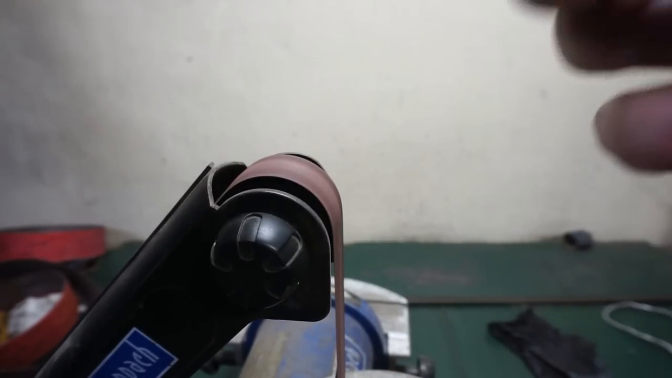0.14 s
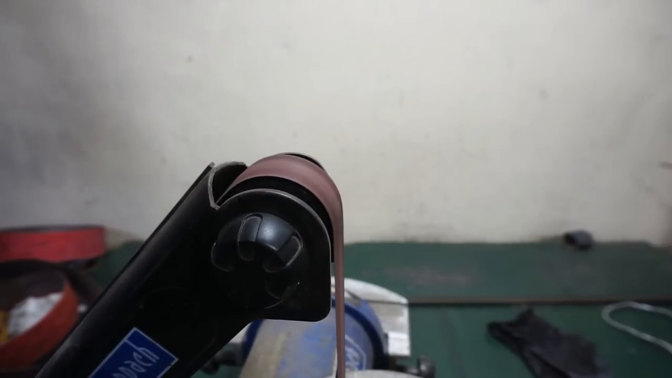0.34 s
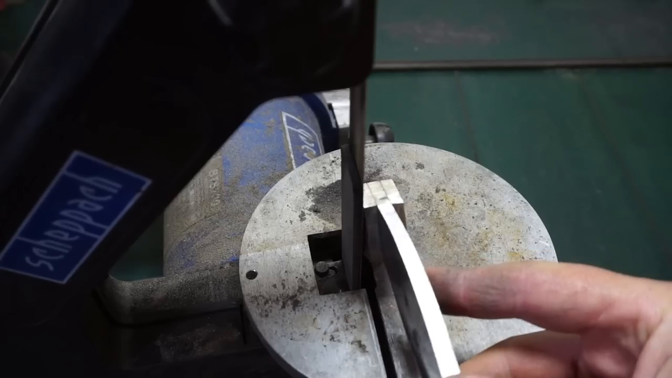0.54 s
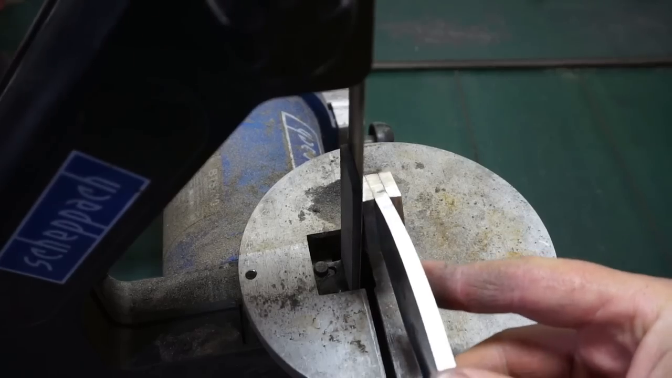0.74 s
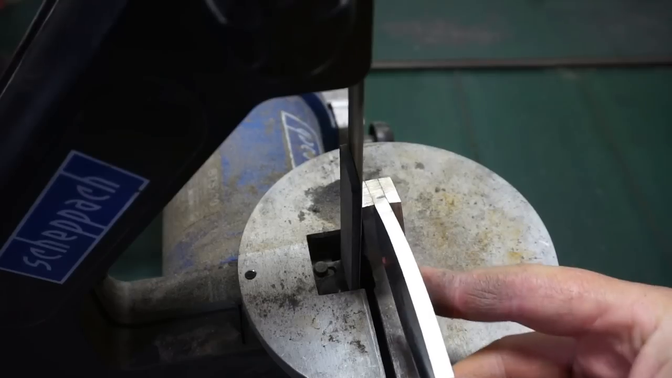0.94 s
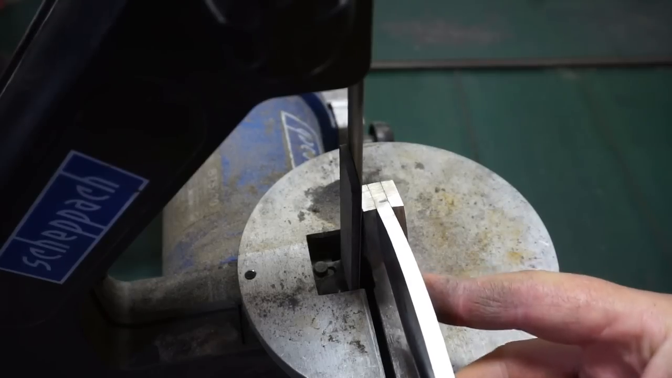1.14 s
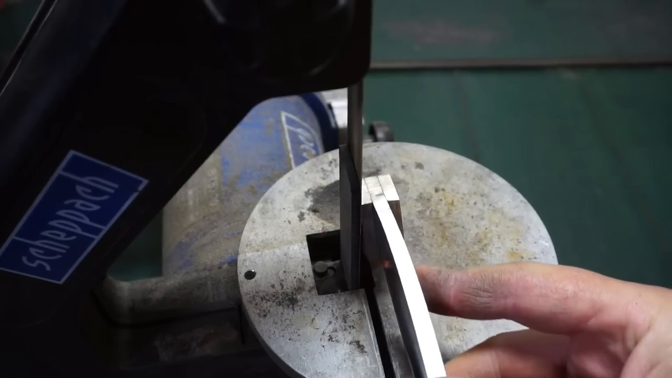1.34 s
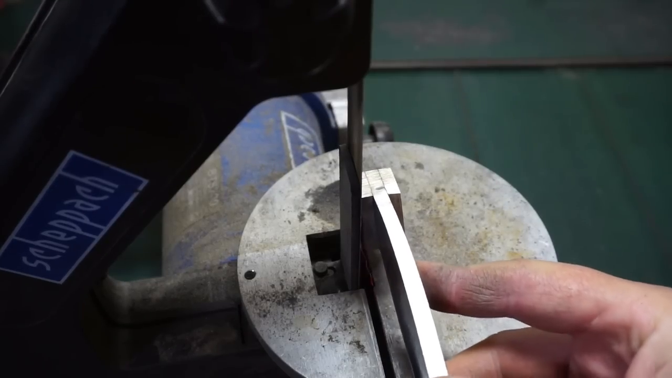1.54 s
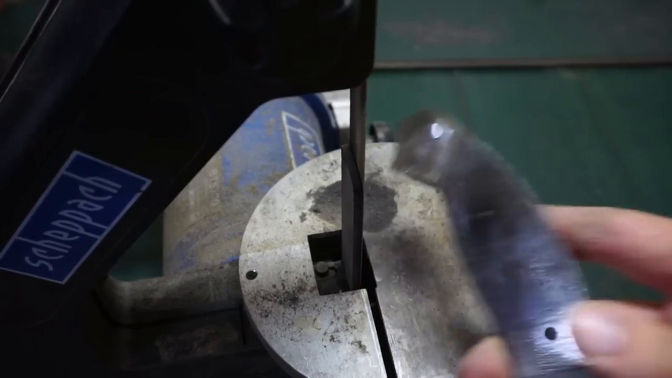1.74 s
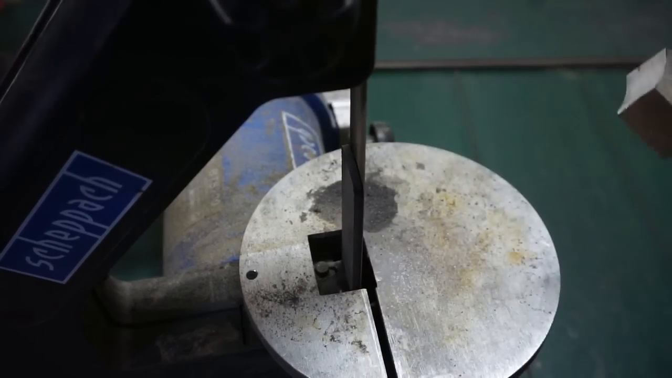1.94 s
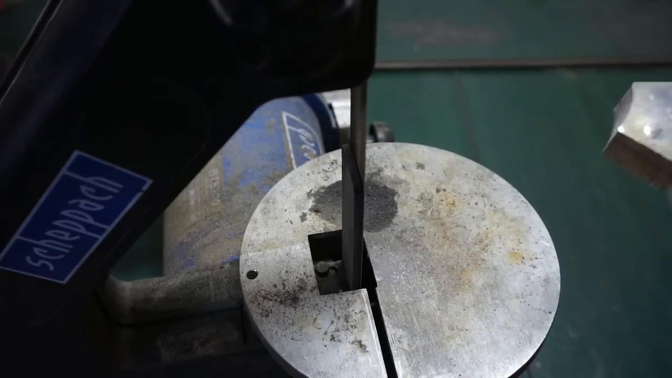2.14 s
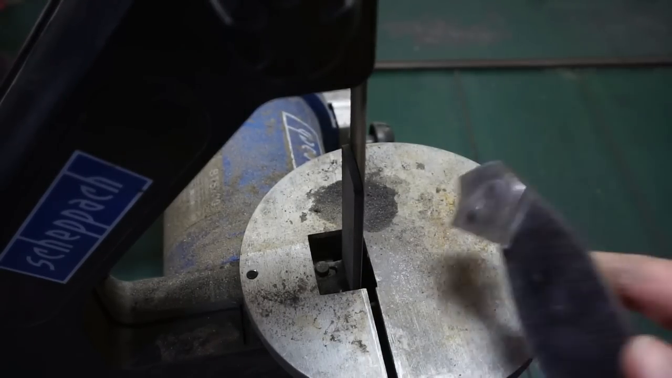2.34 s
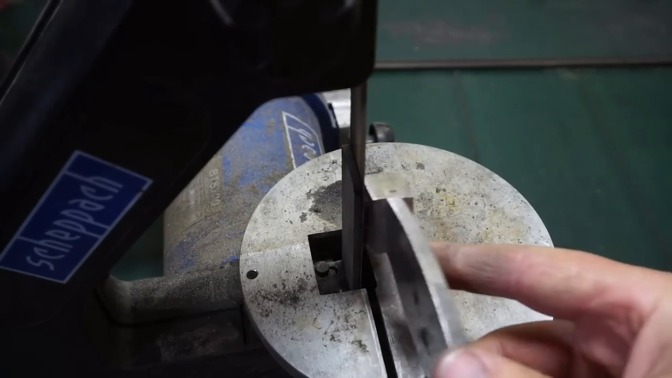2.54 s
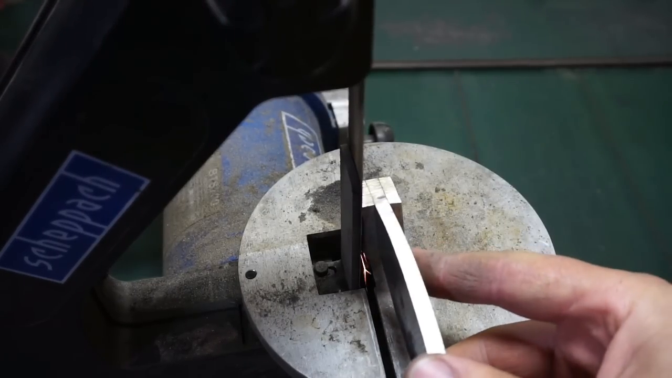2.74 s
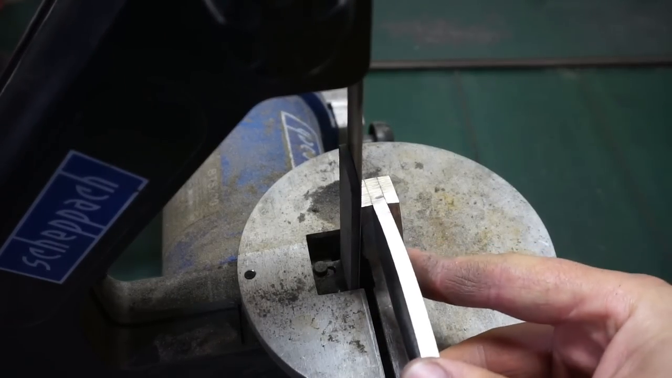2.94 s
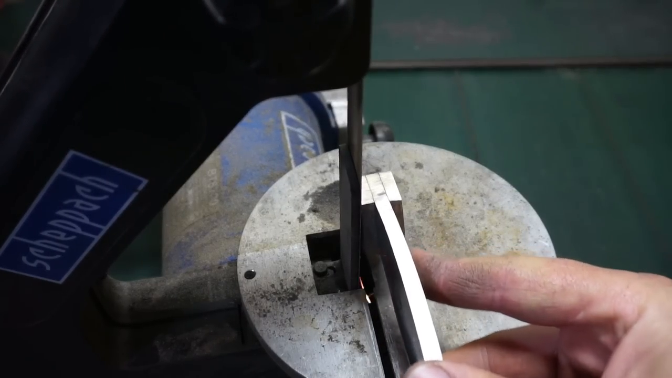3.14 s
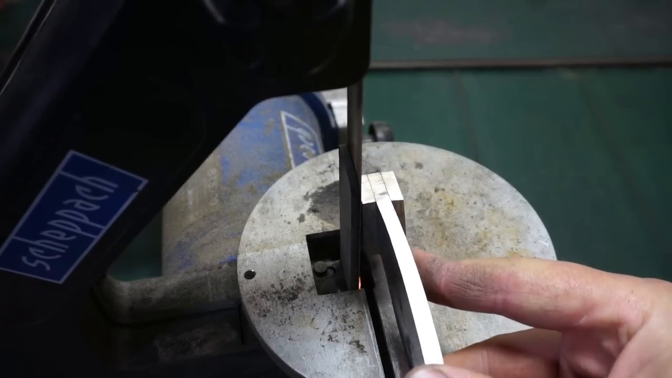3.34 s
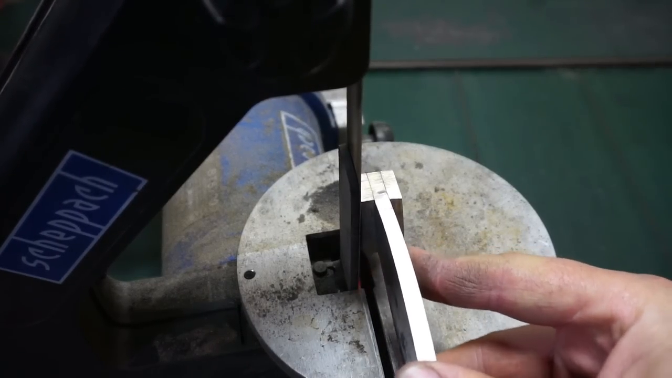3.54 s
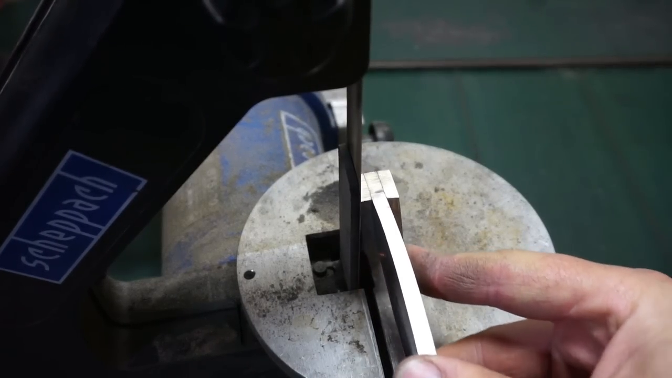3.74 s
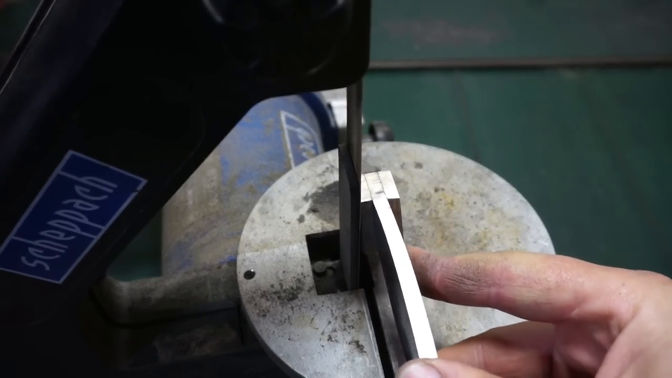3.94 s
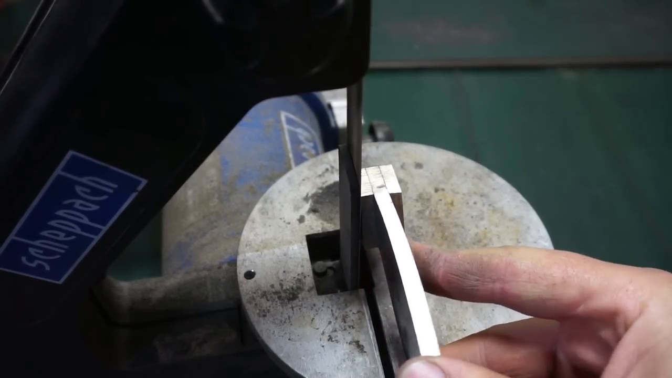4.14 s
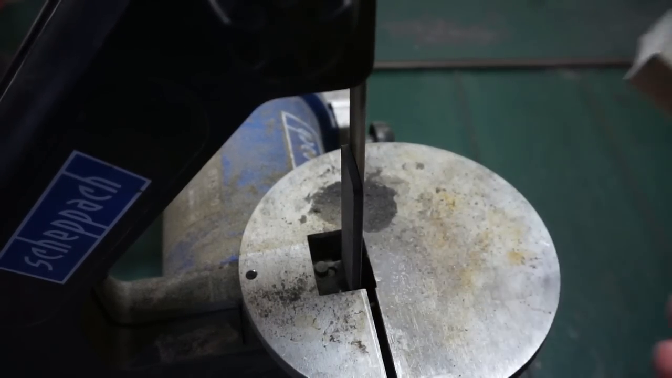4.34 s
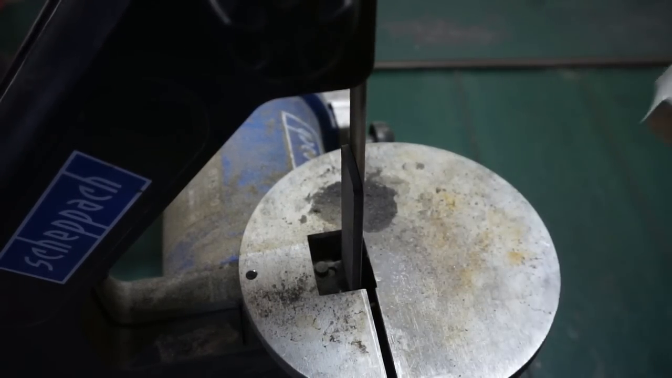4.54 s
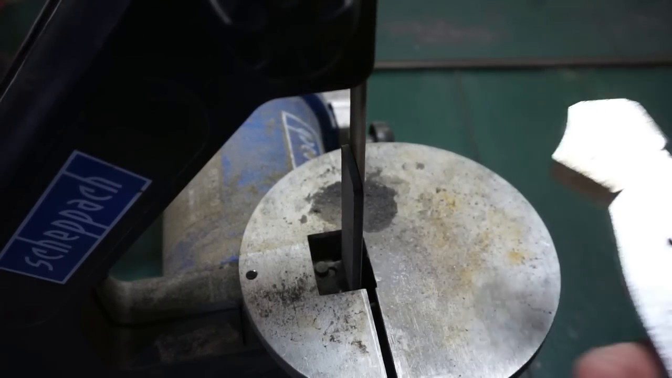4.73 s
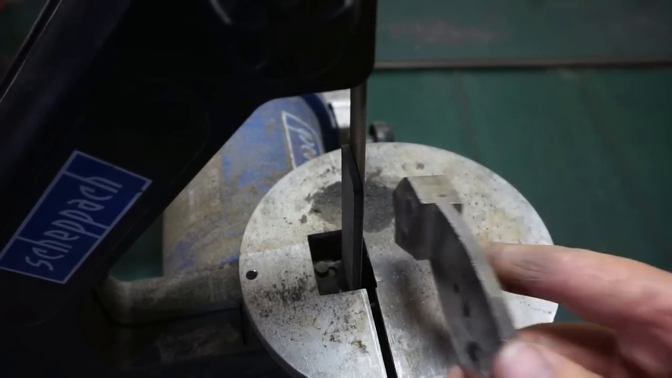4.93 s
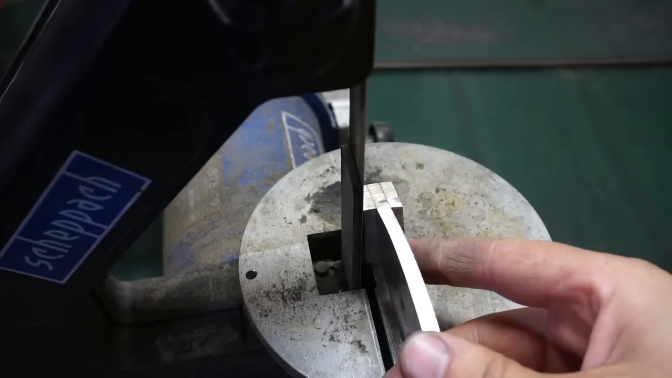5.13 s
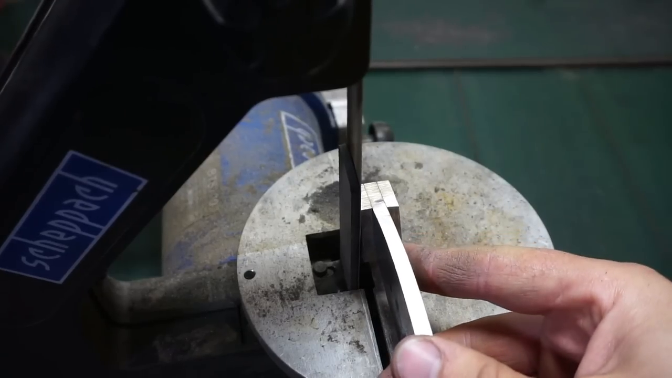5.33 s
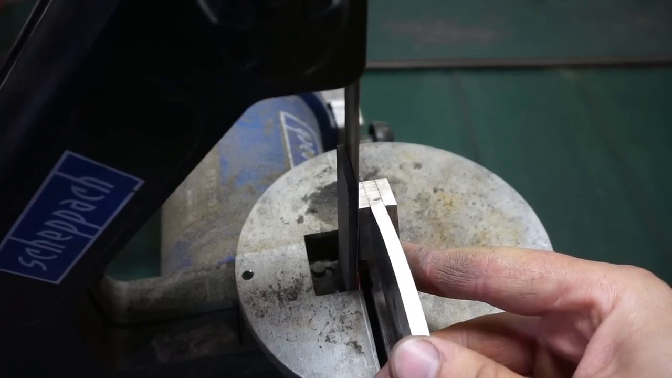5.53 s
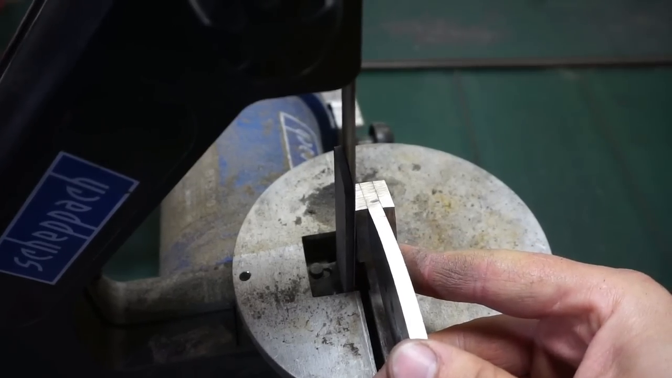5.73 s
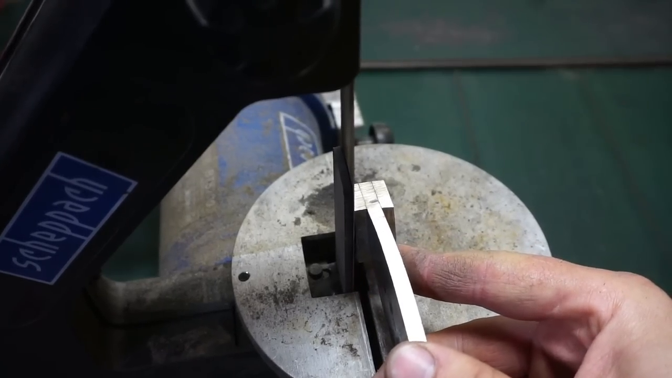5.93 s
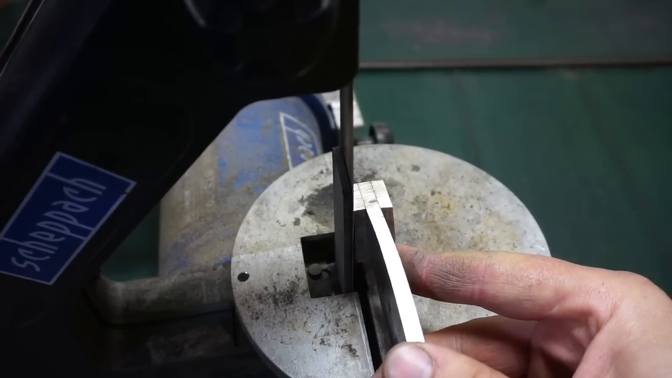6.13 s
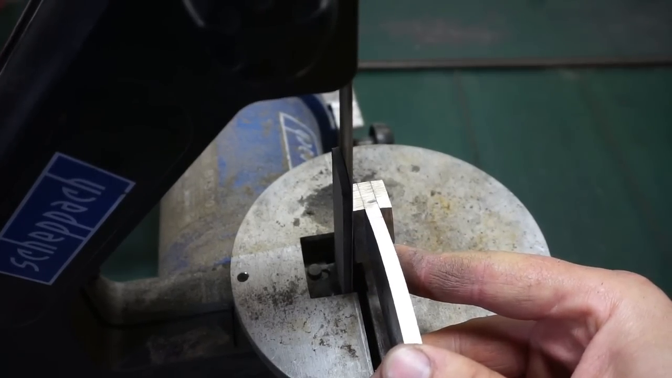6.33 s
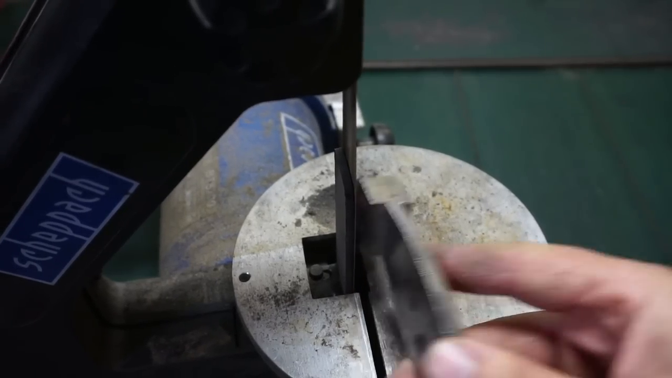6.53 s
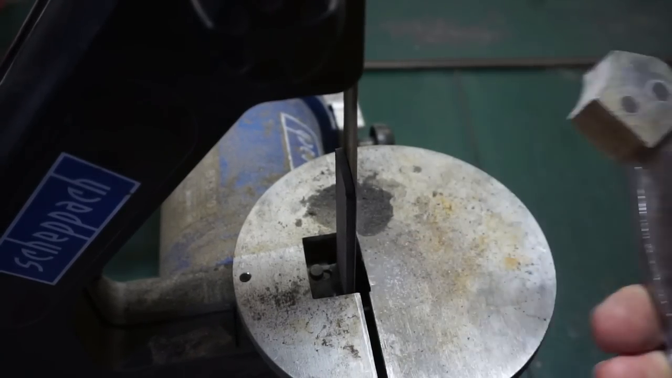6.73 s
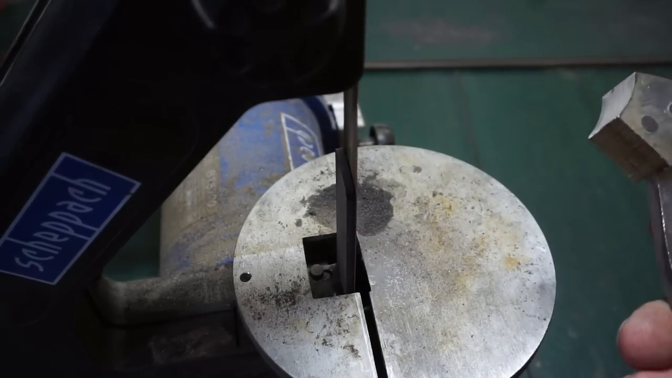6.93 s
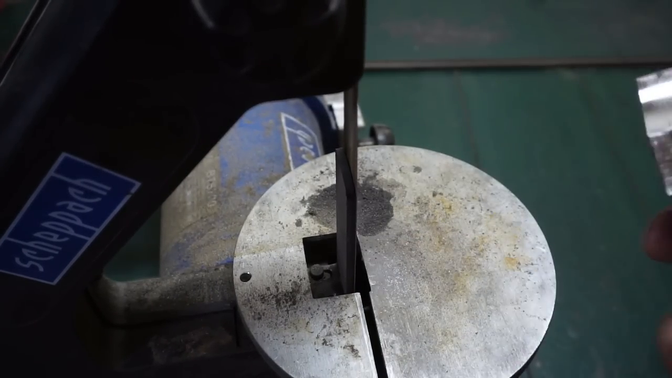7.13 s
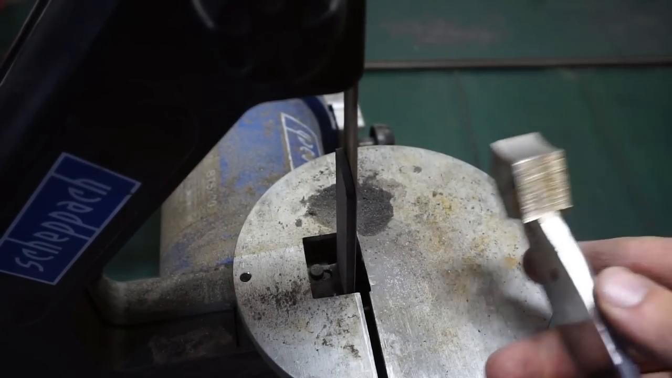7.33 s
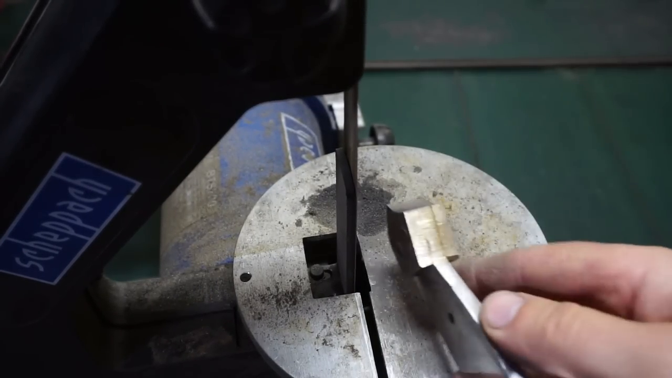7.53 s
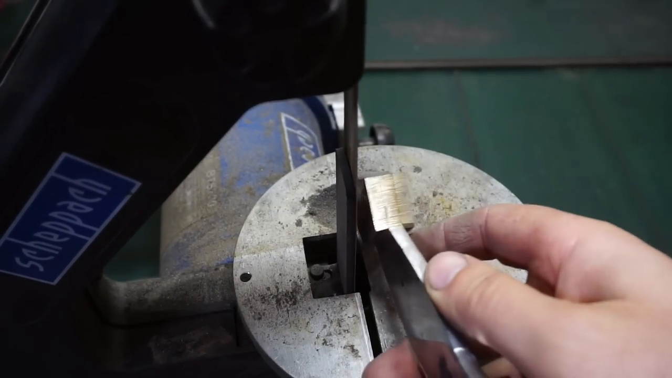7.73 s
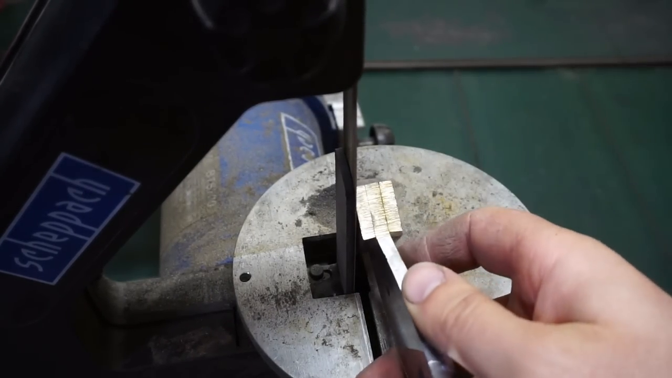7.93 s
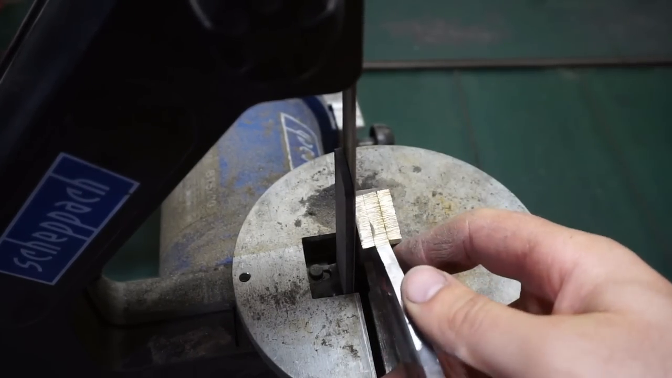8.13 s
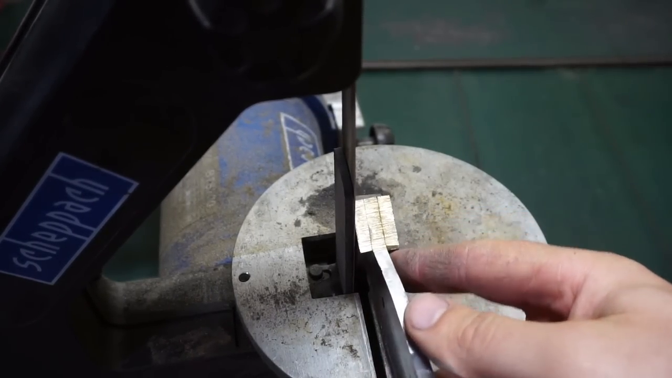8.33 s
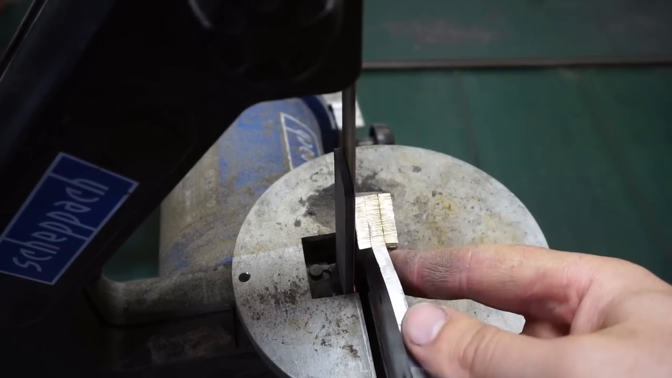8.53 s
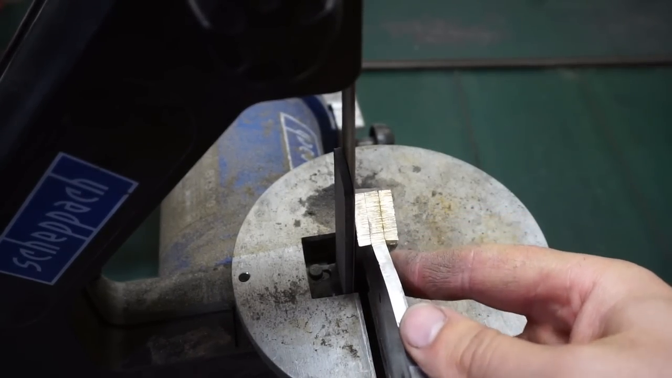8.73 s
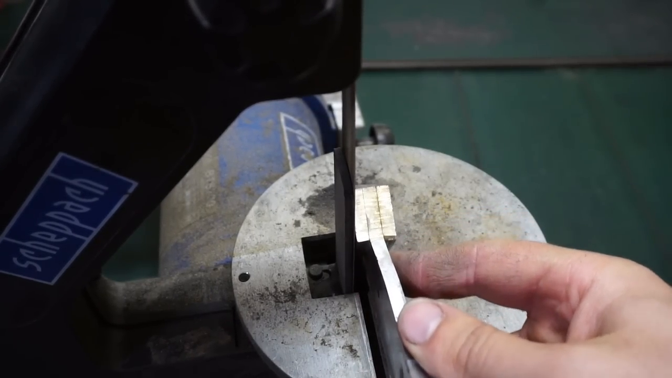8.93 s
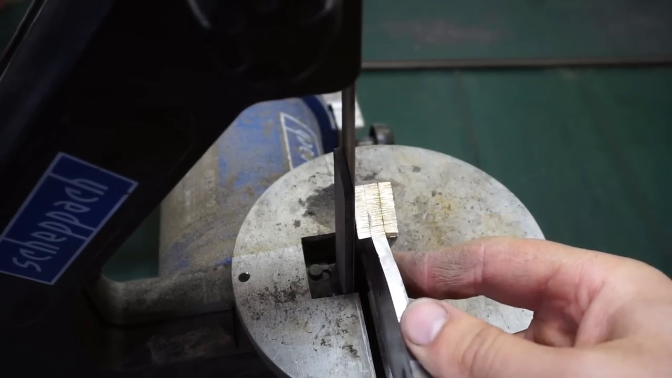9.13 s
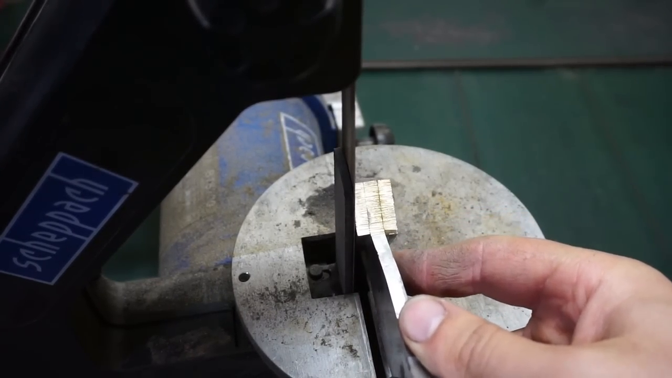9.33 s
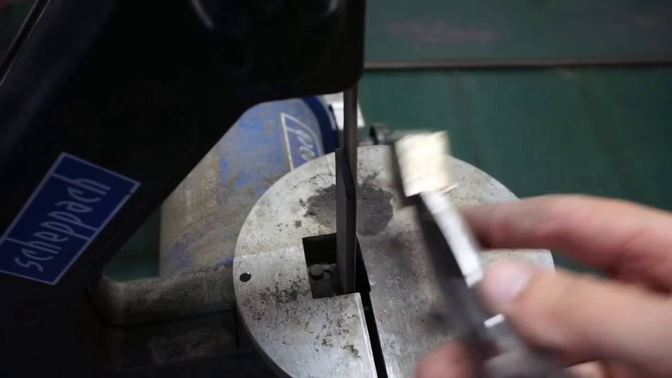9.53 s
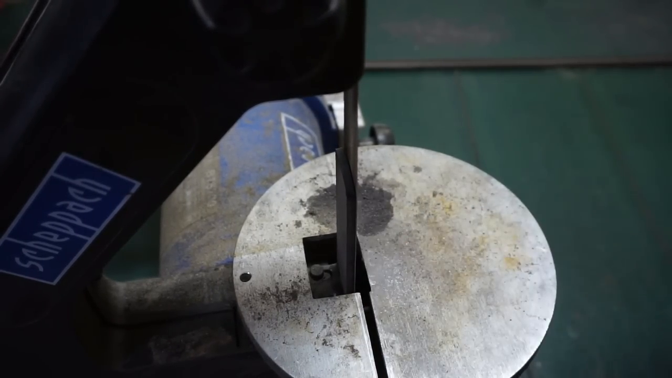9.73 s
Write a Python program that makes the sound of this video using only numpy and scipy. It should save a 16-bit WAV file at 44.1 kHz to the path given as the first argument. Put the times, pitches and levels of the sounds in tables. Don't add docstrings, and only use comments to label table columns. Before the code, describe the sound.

A small belt sander runs from the start, slightly distant: steady low motor hum, bench rumble, hollow frame drone and airy belt hiss. At 0.55 s the view turns close and steel is already biting: bright tearing scrape, midrange metallic ringing from the backing plate, gritty jolts, motor pitch sagging slightly. A sharp flare ends it at 1.7 s; the shaft spins up quickly and the drone and hiss swell back with small belt slaps. The second grind, 2.57-4.2 s, wavers, skipping briefly near 3.35 s. Free running follows. The third, 5.07-6.55 s, opens with a high squeal and sags deepest. More free drone, flapping around 7.3 s. The fourth, 7.83-9.5 s, begins hesitantly with chirps and knocks, then scrapes loudest and brightest, singing thinly. The belt then runs free to the end. Close, dry stereo; automatic gain ducks the hum under each grind.

```python
import sys
import numpy as np
from scipy import signal
from scipy.fft import rfft, irfft, next_fast_len
from scipy.io import wavfile
from scipy.ndimage import uniform_filter1d

SR = 44100
rng = np.random.default_rng(int(sys.argv[2]) if len(sys.argv) > 2 else 0)


def voltage_ratio(decibels):
    exponent = np.asarray(decibels, float) / 20
    return 10 ** exponent


def pcm_store(signal):
    levels = np.round(np.clip(np.atleast_2d(signal), -1, 1) * 32767)
    wavfile.write(sys.argv[1], SR, levels.astype(np.int16).T)


N = 430857
TIME_S = np.arange(N) / SR
SLOW_S = TIME_S[::64]
LEAD = 2048

# (frequency [Hz], likeness [0-1], left lag [rad], left-right [dB])
PORTS = [(193, 0.94, 0.5, 1), (322, 1, -1.54, 1.5), (520, 1, 0.16, -9.5), (780, 0.94, -0.05, 0),
         (1130, 0.72, 0, -5), (1740, 0.91, -0.7, -0.5), (2150, 0.97, 0.5, -3), (2700, 0.44, 0.6, -3.5),
         (3420, 0.4, 0.7, -1), (4200, 0.17, 1.2, -4.5), (6000, 0.46, 1.1, -5), (8140, 0.43, 1.6, -3),
         (9500, 0.45, 1.45, -2), (11500, 0.57, 4, -4), (15500, 0.56, 3.5, -4)]

# (multiple of pulse rate, near level [dB], far level [dB])
HUM_TONES = [(2, -20, -25), (3, 0, -0.5), (4, -9, 0), (5, -16.5, -13), (6, -9.5, -7), (7, -4, -18),
             (8, -4.5, -9), (9, -5, -4)]
# (frequency [Hz], density [dB/Hz])
HUM_AIR = [(140, -72), (235, -3), (274, -1), (319, -4), (405, -5), (454, -6.5), (572, -1.5), (620, -7),
           (810, 1), (1360, -120)]
# (multiple, time [s], gain [dB], half length [s])
HUM_SWELLS = [(8, 3.16, 21.5, 0.32), (8, 4.0, 10, 0.21), (8, 2.26, 9.5, .25), (9, 2.47, 9, 0.28),
              (7, 1.93, 6.5, 0.23), (4, 2.35, -16, 0.18), (8, 4.43, 5, .25), (7, 4.53, 4.5, .3),
              (7, 7.1, 3, 0.27), (4, 7.63, 7, .3), (5, 7.7, 11, 0.37), (6, 7.15, 6, 0.19),
              (8, 4.66, 9, 0.053), (9, 7.3, 8, .1), (9, 4.8, 6, .1), (4, 1.6, 7, 0.35), (4, 8.8, 6.5, .3),
              (8, 7.2, 5, .07), (3, 7.8, -3, .04), (6, 4.58, -1, 0.074), (8, 9.15, 12, 0.21),
              (7, 9.65, 7, 0.16), (8, 0.93, 8, 0.23), (4, 5.92, 11.5, 0.35), (6, 5.79, 13.5, 0.32),
              (5, 6.85, 12.5, 0.33), (4, 2.85, 8, 0.2), (6, 2.72, 10.5, 0.13)]
# (frequency [Hz], density [dB/Hz])
RUMBLE = [(12, -40), (20, -26), (32, 1), (49, -5.5), (101, -1), (135, -8), (171, -5), (200, -9), (260, -28),
          (440, -120)]

# (start [s], settled drone [dB], settled hiss [dB], settled hum [dB], gain still held down [dB])
IDLES = [
    (0, -50, -54.5, -55, 5.5),
    (1.715, -44.5, -47, -50, 7),
    (4.215, -42.5, -45, -49, 9),
    (6.55, -43, -45, -49, 8.5),
    (9.49, -42.5, -45, -49, 4.5),
]
# (frequency [Hz], width [Hz], level [dB])
DRONE_MODES = [(670, 49, 3), (720, 72, 4), (772.5, 98, -0.5), (1288, 74, -7.5), (1494, 108, -9),
               (1790, 63, -9), (1927, 73, -11), (2203, 142, -6)]
# (frequency [Hz], density [dB/Hz])
DRONE_BED = [(450, -26), (600, -40), (1000, -15.5), (2300, -34.5), (2700, -22.5), (4000, -31)]
# (frequency [Hz], density [dB/Hz])
HISS_FAR = [(1530, -38), (2600, -12), (3020, -8), (3650, -4), (3940, -6), (5160, -1.5), (5650, -3),
            (7030, -3), (8680, -5), (13200, -5), (15800, -9)]
# (frequency [Hz], density [dB/Hz])
HISS_NEAR = [(1530, -23), (2600, -7), (3240, -5.5), (5200, -0.5), (5520, -4), (5960, 0), (7640, -5.5),
             (8880, -2.5), (11100, -5), (12100, -2.5), (13500, -6.5), (14900, -3), (15800, -12)]
# (time [s], peak [dB])
SLAPS = [(1.941, -37), (2.279, -39), (2.456, -37), (4.447, -41), (4.66, -34), (4.819, -40), (5.019, -47),
         (7.158, -40), (7.289, -34), (7.345, -38), (7.459, -36), (7.646, -33), (7.719, -35), (9.66, -37)]

# (first touch [s], belt pressed onto plate [s], lift [s], speed sag [Hz])
GRINDS = [
    (.553, .553, 1.715, 2.0),
    (2.572, 2.64, 4.215, 2.9),
    (5.068, 5.14, 6.566, 3.8),
    (7.826, 7.962, 9.515, 1.9),
]
# (scrape [dB], sizzle [dB], hum [dB], hum growth [dB/s], rumble [dB])
BITES = [
    (-52.5, -50.5, -55, -3.5, -84),
    (-49.5, -52, -57, -2.5, -84.5),
    (-49, -52, -57, -0.5, -84.5),
    (-45, -51.5, -56, 2, -78.5),
]
# (time [s], pressure as plate level [dB], lean onto frame [dB])
HANDS = [
    [(.553, -40, -5), (.565, -42, -9.5), (.75, -41, -8.5), (.9, -41.5, -9), (1.02, -41, -10),
     (1.25, -41, -10), (1.5, -41, -10), (1.6, -41, -7.5), (1.715, -44.5, -11)],
    [(2.64, -47.5, -3), (2.75, -40, -10), (2.98, -39.5, -14), (3.09, -42, -12), (3.2, -39.5, -7.5),
     (3.43, -43, -8.5), (3.6, -39.5, -10), (3.88, -40.5, -8.5), (4.215, -42.5, -12)],
    [(5.14, -47.5, -5), (5.26, -40.5, -10), (5.4, -41, -8), (5.55, -41, -9), (5.75, -42.5, -4.5),
     (5.97, -40.5, -9), (6.2, -42, -8), (6.32, -39.5, -12.5), (6.54, -41.5, -9.5)],
    [(7.962, -47, -8), (8.0, -45.5, -4.5), (8.2, -45, -7), (8.33, -42, -5.5), (8.5, -45.5, -5),
     (8.67, -40.5, -7), (8.8, -44.5, -6.5), (9.1, -43.5, -6), (9.49, -43, -6)],
]
# (frequency [Hz], width [Hz], level [dB])
FRAME_MODES = [(699.4, 32.5, 0), (796, 51, 0.5)]
# (frequency [Hz], density [dB/Hz])
FRAME_BED = [(400, -39), (580, -21), (900, -5.5), (1100, -50)]
# (frequency [Hz], width [Hz], level [dB])
PLATE_MODES = [(1018, 15, -8), (1238, 40, -6.5), (1498, 48, -2), (1559, 36, 0.5), (1697, 33, -3),
               (1783, 39, -5), (2002, 56, -3), (2140, 35, 3.5), (2254, 48, -0.5), (2707, 55, -8.5),
               (2815, 38, -10.5), (3066, 85, -11.5), (3850, 200, -19), (4920, 110, -17)]
# (frequency [Hz], width [Hz], level [dB])
PLATE_END_MODES = [(1260, 22, -7), (1560, 112, -6), (2025, 83, -4.5), (2151, 45, 0.5), (2274, 58, -2),
                   (2563, 19, -8), (3063, 45, -10.5), (3827, 210, -18.5), (5100, 100, -19.5)]
# (frequency [Hz], density [dB/Hz])
PLATE_BED = [(800, -52), (1000, -16.5), (1850, -16), (2200, -17), (2420, -14.5), (2700, -14), (3400, -20),
             (4500, -19), (5600, -21.5), (7500, -31)]
# (time [s], peak [dB], upper ring relative to it [dB])
JOLTS = [(0.767, -33, -10), (0.8562, -28, -8), (0.8942, -30, -6), (0.9391, -32, -5), (1.0039, -31, -8),
         (1.1097, -31, -9), (1.2928, -35, -8), (1.3521, -30, -7), (1.5362, -38, -5), (1.5991, -30, -3),
         (2.6477, -35, 0), (2.677, -32, 0), (2.725, -31, 0), (2.7879, -37, -5), (2.8303, -40, -4),
         (2.8682, -32.5, -3), (3.0453, -31, -8), (3.1855, -32, -8), (3.2363, -35, -4), (3.2777, -33, -4),
         (3.3596, -27, -8), (3.4204, -27, -7), (3.5377, -29, -11), (3.8425, -29, -3), (4.0026, -30, -4),
         (4.0964, -35, 0), (4.1702, -29, -8), (5.2912, -31.5, -5), (5.3934, -34, -6), (5.4503, -34, -5),
         (5.6149, -32, -7), (5.6509, -39, -7), (5.9157, -37, -10), (5.9661, -34, -6), (6.0654, -32, -5),
         (6.1647, -28, -7), (6.2305, -33, -4), (6.3039, -32, -7), (6.3772, -35, -8), (6.446, -33, -8),
         (6.4924, -26.5, -8), (7.8294, -38, -7), (7.9651, -36, -7), (8.0319, -36, -2), (8.0709, -28, -13),
         (8.4395, -38, -6), (8.8725, -27.5, -6), (8.9863, -37, -9), (9.0247, -28, -5), (9.4128, -32, -8)]
# (time [s], loss [dB])
SLIPS = [
    (1.329, 8),
    (3.343, 9),
    (3.445, 6),
    (7.82, 6.5),
    (8.02, -2),
]

# (frequency [Hz], density [dB/Hz])
SCRAPE = [(3650, -10), (6200, -0.5), (6610, 5.5), (7370, 0.5), (9210, -0.5), (11000, -3), (12500, -4),
          (16200, -37), (22000, -120)]
# (frequency [Hz], density [dB/Hz])
SCRAPE_THICK = [(3650, -19), (6200, -4), (8170, -1.5), (9320, -1), (11000, -7), (12500, -5.5), (16200, -41),
                (22000, -120)]
# (frequency [Hz], width [Hz], level [dB])
THICK_MODES = [(7550, 50, 6), (8110, 81, -7), (8550, 130, -7), (9500, 100, 2), (10600, 37, -18.5)]
# (frequency [Hz], density [dB/Hz])
SIZZLE = [(5880, -38), (10000, -3), (11000, -10), (13700, 2), (15100, -1), (15800, -1)]
# (time [s], centre [Hz], level above scrape [dB])
EDGE = [(.55, 8100, -4), (1.6, 8350, 5), (1.7, 9500, -7), (2.57, 9500, -4), (2.7, 8300, -15),
        (3.5, 9200, -2), (3.65, 8650, -10), (4.2, 9000, -1), (5.07, 9700, 9), (5.15, 9500, -5),
        (5.25, 8500, -8), (6.5, 8650, -10), (7.83, 7240, -15), (7.95, 7400, -2), (8.1, 7540, -16),
        (8.35, 8600, -3.5), (9.0, 8300, -11), (9.5, 8600, -6)]
# (time [s], scrape flare [dB], sizzle flare [dB], rise [s], fall [s])
CATCHES = [(.559, 4, 4.5, .004, .25), (1.705, 15.5, 6, 0.022, .006), (2.582, 6, 5, .008, 0.24),
           (3.466, 5, 3, .01, .06), (4.215, 3, 2, .01, .01), (5.104, 7, 2.5, .04, 0.14),
           (5.558, 5, 4, .03, .015), (5.88, 0, 5, 0.15, .1), (6.546, 7.5, 5, .008, .012),
           (7.858, 7, 3, .012, 0.024), (7.835, 1, 7, .01, 0.011), (7.89, -10, 5, 0.013, 0.0073),
           (7.96, 1, 0, .05, .04), (8.24, 1, 2, 0.11, .015), (9.505, -2, 1, 0.0098, .01),
           (9.48, 1, 0, .4, 0.049)]

# (time [s], level [dB])
KNOCKS = [
    (4.096, -41),
    (7.83, -41),
    (8.032, -37),
    (8.44, -41),
]
# (time [s], frequency [Hz], level [dB], rise [s], fall [s])
SQUEALS = [(5.08, 9500, -48, .004, .06), (5.115, 13700, -54, .015, .03), (5.12, 6600, -58, .02, .03),
           (7.87, 12300, -46, .02, 0.033), (7.93, 7600, -58, .03, .06), (8.235, 14600, -48, .08, .012),
           (8.33, 8900, -51, 0.014, .05), (8.39, 8800, -54, 0.023, 0.033), (8.44, 8700, -55, .015, .05),
           (5.19, 8000, -57, .01, .015), (8.7, 8300, -60, .08, 0.098), (9.0, 8500, -54, .08, .08),
           (9.3, 8400, -52, .08, .1)]

NEARER_S = 0.553
FREE_HZ, FAR_EXTRA_HZ, ROLLER_HZ = 90.4, 0.8, 29.2
SAG_S, SPIN_UP_S = 0.12, 0.0504
RECOVER_S, HUM_SHARE, RUMBLE_BELOW_DB = 0.37, 0.75, 19
TOUCH_DRONE_DB, TOUCH_HISS_DB, TOUCH_HUM_DB = 7.5, 4.5, 7.5
TOUCH_S, SETTLE_S = 0.032, 0.099
DEEP_S, DEEP_DB, DEEP_HALF_S = 8.18, 7, 0.14
SLIP_S, LIFT_S, LIFT_DB = 0.015, 0.017, 11
SLAP_FROM_DB, SLAP_SHARE, SLAP_RISE_S, SLAP_FALL_S = -40.5, 0.47, 0.0055, 0.022
JOLT_FROM_DB, JOLT_SHARE, JOLT_RISE_S, JOLT_FALL_S = -35, 0.68, 0.0065, 0.021
JOLT_EVEN_DB, RINGS_PART_HZ = -5.5, 1840
STEADY, STEADY_S = 0.94, 0.044


def evened(x):
    return x / np.sqrt(np.mean(x ** 2) + 1e-20)


def above(x, hz):
    return signal.sosfilt(signal.butter(3, hz, "high", fs=SR, output="sos"), x)


def read(points, hz, axis=1):
    table = np.transpose(points)
    return np.interp(np.log(hz + 1), np.log(table[0] + 1), table[axis])


def fine(values):
    return np.interp(TIME_S, SLOW_S, values)


def bump(t, s, rise_s, fall_s):
    return np.exp(-abs(t - s) / np.where(t < s, rise_s, fall_s))


def since(t, s, fall_s):
    return (t >= s) * bump(t, s, 1, fall_s)


def surges(t, rows, from_db, share, rise_s, fall_s):
    return sum(share * max(db - from_db, 0) * bump(t, s, rise_s, fall_s) for s, db in rows)


def slips(t):
    return sum(db * bump(t, s, SLIP_S, SLIP_S / 2) for s, db in SLIPS)


def drift(hz, size):
    knots_hz = 400
    knots = rng.standard_normal(int(size / SR * knots_hz) + 9)
    knots = signal.lfilter(*signal.butter(1, 2 * hz / knots_hz), knots)
    return np.interp(np.arange(size) / SR * knots_hz, np.arange(len(knots)), evened(knots))


def grit(size, per_s, spread_db):
    sizes_db = spread_db * np.minimum(rng.exponential(1, (2, size)), 3.5)
    heights = voltage_ratio(sizes_db) * rng.standard_normal((2, size))
    return evened(heights * (rng.random((2, size)) < per_s / SR))


def body(drive, bed, modes, lo_hz, hi_hz, bed_db=0):
    size = next_fast_len(drive.shape[1] + 8192)
    hz = np.fft.rfftfreq(size, 1 / SR)
    ring = sum((-1) ** k * voltage_ratio(db) * w / (w + 2j * (hz - f)) for k, (f, w, db) in enumerate(modes))
    smooth = voltage_ratio(read(bed, hz) + bed_db) * np.minimum(hz / bed[0][0], 1) ** 4
    skirts = np.minimum(smooth * voltage_ratio(28), 1)
    phase = np.angle(ring + smooth + 1e-9)
    colour = np.sqrt(abs(ring * skirts) ** 2 + smooth ** 2) * np.exp(1j * phase)
    inside = (hz > lo_hz) & (hz < hi_hz)
    colour /= np.sqrt(np.sum(abs(colour[inside]) ** 2) / len(hz))

    same, lag_rad, tilt_db = (read(PORTS, hz, axis=k) for k in range(1, 4))
    same = np.clip(same, 0, 1)
    left, right = voltage_ratio(tilt_db / 2), voltage_ratio(-tilt_db / 2)
    shared = right * same * np.exp(1j * lag_rad)
    own = right * np.sqrt(1 - same ** 2)
    colour /= np.sqrt(abs(left + shared) ** 2 + own ** 2) / 2
    a, b = rfft(drive, size)
    ports = irfft(colour * np.array([left * a, shared * a + own * b]), size)
    return np.roll(ports, LEAD, axis=1)


def add(mix, s, sound):
    start = round(s * SR) - LEAD
    part = mix[:, max(start, 0):start + sound.shape[1]]
    part += sound[:, max(-start, 0):][:, :part.shape[1]]


def speed_hz():
    hz = FREE_HZ + FAR_EXTRA_HZ * (SLOW_S < GRINDS[0][2])
    for _, press, lift, sag_hz in GRINDS:
        pressed = (SLOW_S >= press) * (SLOW_S < lift)
        hz = hz - sag_hz * (pressed - since(SLOW_S, press, SAG_S) + since(SLOW_S, lift, SPIN_UP_S))
    return fine(hz)


def machine_db():
    t = SLOW_S
    hum_db, rumble_db = np.zeros((2, len(t)))
    for start, _, _, settled_db, held_db in IDLES:
        level_db = settled_db - HUM_SHARE * held_db * since(t, start, RECOVER_S)
        hum_db = np.where(t >= start, level_db, hum_db)
        rumble_db = np.where(t >= start, level_db - RUMBLE_BELOW_DB, rumble_db)
    free_db = rumble_db
    for (touch, _, lift, _), (_, _, base_db, growth_db_per_s, low_db) in zip(GRINDS, BITES):
        on = (t >= touch) & (t < lift)
        choke_db = TOUCH_HUM_DB * since(t, touch, TOUCH_S) * (touch > NEARER_S) + slips(t)
        hum_db = np.where(on, base_db + growth_db_per_s * (t - touch) - choke_db, hum_db)
        rumble_db = np.where(on, low_db + (free_db - low_db) * since(t, touch, SETTLE_S), rumble_db)
    deep_db = DEEP_DB * np.exp(-((t - DEEP_S) / DEEP_HALF_S) ** 2)
    return [fine(uniform_filter1d(db - deep_db, size=9)) for db in (hum_db, rumble_db)]


def motor():
    hum_db, rumble_db = machine_db()
    hz = speed_hz()
    load_hz = np.clip(FREE_HZ - hz, 0, 2)
    pulses = np.cumsum(hz) / SR + 0.01 * drift(2.9, N)
    tones = np.zeros(N)
    for k, near_db, far_db in HUM_TONES:
        level_db = np.where(TIME_S < NEARER_S, far_db, near_db) - 1.75 * load_hz
        level_db = level_db + 0.39 * drift(22, N) + 0.3 * k * drift(1.16, N)
        swell_db = sum((m == k) * db * np.exp(-((SLOW_S - s) / half_s) ** 2)
                       for m, s, db, half_s in HUM_SWELLS)
        blur = (0.05 + 0.019 * load_hz + 0.02 * (3 < k < 7)) * np.sqrt(k)
        turns = k * pulses + blur * drift(7.9, N) + rng.random()
        tones += voltage_ratio(level_db + fine(swell_db)) * np.sin(2 * np.pi * turns)
    hum = voltage_ratio(hum_db)
    mix = voltage_ratio(1) * hum * tones * np.ones((2, 1))
    air = hum * voltage_ratio(-7 + 2.43 * load_hz) * rng.standard_normal((2, N))
    add(mix, 0, body(air, HUM_AIR, [], 215, 840))
    add(mix, 0, body(voltage_ratio(rumble_db) * rng.standard_normal((2, N)), RUMBLE, [], 30, 190))
    return mix


def throb(t, depth_db):
    push = 0.11
    return depth_db * (np.exp(-(t * ROLLER_HZ % 1) / push) - push)


def free_run(start, drone_db, hiss_db, held_db, touch, end):
    t = np.arange(start, end, 1 / SR)
    gain_db = -held_db * since(t, start, RECOVER_S) - slips(t)
    flap_db = drift(16, len(t))

    drone_db = drone_db + gain_db - TOUCH_DRONE_DB * (t > touch) + flap_db - 0.5
    drone_db = drone_db + surges(t, SLAPS, SLAP_FROM_DB, SLAP_SHARE, SLAP_RISE_S, SLAP_FALL_S)
    drone = body(voltage_ratio(drone_db) * grit(len(t), 9000, 2.8), DRONE_BED, DRONE_MODES, 500, 3200)

    hiss_db = hiss_db + 0.94 * gain_db - TOUCH_HISS_DB * (t > touch)
    hiss_db = hiss_db + 0.73 * flap_db + throb(t, 3.4)
    colour = HISS_NEAR if start else HISS_FAR
    hiss = body(voltage_ratio(hiss_db) * grit(len(t), 30000, 4.7), colour, [], 2200, 19600)
    return start, drone + hiss


def steadied(x):
    power = uniform_filter1d((x ** 2).mean(0), round(STEADY_S * SR)) + 1e-12
    return x * np.minimum(np.median(power) / power, 4) ** (STEADY / 2)


def grind(hand, flutter_db, blade_end):
    at, pressure_db, lean_db = np.transpose(hand)
    s = at[0]
    t = np.arange(s, at[-1], 1 / SR)
    plate_db, lean_db = np.interp(t, at, pressure_db), np.interp(t, at, lean_db)
    flutter_db = np.interp(t, TIME_S, flutter_db)
    heard = s + (np.arange(next_fast_len(len(t) + 8192)) - LEAD) / SR

    frame_db = plate_db + lean_db - 0.5 * slips(t) + 0.69 * flutter_db
    frame = steadied(body(grit(len(t), 8000, 2.4), FRAME_BED, FRAME_MODES, 420, 1300))
    sound = frame * voltage_ratio(np.interp(heard, t, frame_db))

    plate_db = plate_db - 0.38 * slips(t) - LIFT_DB * bump(t, t[-1], LIFT_S, 1)
    plate_db = plate_db + 0.44 * flutter_db + throb(t, 1.3) - 1.1
    modes = PLATE_END_MODES if blade_end else PLATE_MODES
    plate = body(grit(len(t), 9000, 2.36), PLATE_BED, modes, 1380, 2430)
    lower = signal.sosfiltfilt(signal.butter(6, RINGS_PART_HZ, fs=SR, output="sos"), plate)
    for ring, side in ((lower, -1), (plate - lower, 1)):
        blows = [(when, db + side * 0.55 * (tilt_db - JOLT_EVEN_DB)) for when, db, tilt_db in JOLTS]
        jolt_db = surges(t, blows, JOLT_FROM_DB, JOLT_SHARE, JOLT_RISE_S, JOLT_FALL_S)
        sound = sound + voltage_ratio(np.interp(heard, t, plate_db + jolt_db)) * steadied(ring)
    return s, sound


def resonate(x, hz, width_hz):
    turn = np.exp(2j * np.pi * np.cumsum(hz) / SR)
    r = np.exp(-np.pi * width_hz / SR)
    return (turn * signal.lfilter([1], np.convolve([1, -r], [1, -r]), x / turn)).real


def scrape(touch, lift, scrape_db, sizzle_db, flutter_db, thick):
    t = np.arange(touch, lift, 1 / SR)
    flares_db = sum(np.outer(db, bump(t, s, rise_s, fall_s)) for s, *db, rise_s, fall_s in CATCHES)
    scrape_db = scrape_db + flares_db[0] - slips(t) + drift(30, len(t))
    sizzle_db = sizzle_db + flares_db[1] - 1.2 * slips(t) - 1 + 1.6 * drift(30, len(t))
    grains_db = 1.14 * np.interp(t, TIME_S, flutter_db) + throb(t, 2.9)
    grains = voltage_ratio(grains_db) * grit(len(t), 25000, 3.9)

    at, edge_hz, edge_db = np.transpose(EDGE)
    singing = evened(resonate(grains, np.interp(t, at, edge_hz), 2500))
    broad = grains + 0.36 * voltage_ratio(np.interp(t, at, edge_db)) * singing
    colour, modes = (SCRAPE_THICK, THICK_MODES) if thick else (SCRAPE, [])
    bright = body(voltage_ratio(scrape_db) * broad, colour, modes, 5100, 10900, bed_db=10)
    sizzle = body(voltage_ratio(sizzle_db) * grains, SIZZLE, [], 11000, 15600)
    return touch, voltage_ratio(-2.5) * bright + sizzle


def knock(s, db):
    fall_s = 0.0088
    t = np.arange(0, 0.08, 1 / SR)
    burst = voltage_ratio(db) * np.exp(-t / fall_s) * grit(len(t), 9000, 1.4)
    return s, body(burst, PLATE_BED, PLATE_END_MODES, 1100, 3000)


def squeal(s, hz, db, rise_s, fall_s):
    spread, skirt_db = 1.15, -24
    t = np.arange(s - 4 * rise_s, s + 5 * fall_s, 1 / SR)
    band = [(hz / spread, skirt_db), (hz, 0), (hz * spread, skirt_db), (22000, -90)]
    grains = voltage_ratio(db) * bump(t, s, rise_s, fall_s) * grit(len(t), 25000, 3)
    return t[0], body(grains, band, [], 4000, 16000)


def bench_echoes(mix):
    span = 1400
    taps = np.zeros(span)
    at = rng.integers(60, span, 36)
    taps[at] = voltage_ratio(-14 * at / span) * rng.choice([-1., 1.], len(at))
    taps = voltage_ratio(-19) * above(taps, 2600)
    taps[0] += 1
    return signal.oaconvolve(mix, taps[None], axes=1)[:, :N]


def scene():
    mix = motor()
    flutter_db = drift(6.6, N)
    starts = [0] + [hand[-1][0] for hand in HANDS]
    ends = [row[:2] for row in GRINDS] + [(N / SR, N / SR)]
    for (_, drone_db, hiss_db, _, held_db), start, (touch, press) in zip(IDLES, starts, ends):
        add(mix, *free_run(start, drone_db, hiss_db, held_db, touch, press))
    for k, ((touch, _, lift, _), bite, hand) in enumerate(zip(GRINDS, BITES, HANDS)):
        scrape_db, sizzle_db = bite[:2]
        add(mix, *grind(hand, flutter_db, k > 1))
        add(mix, *scrape(touch, lift, scrape_db, sizzle_db, flutter_db, k > 2))
    for row in KNOCKS:
        add(mix, *knock(*row))
    for row in SQUEALS:
        add(mix, *squeal(*row))
    return bench_echoes(mix)


def roll_off(x):
    return signal.sosfilt(signal.butter(12, 15900, fs=SR, output="sos"), x)


def record(dry):
    ceiling = 0.1
    excess = dry - ceiling * np.tanh(dry / ceiling)
    left, right = dry - above(excess, 540)
    mid = (left + right) / 2
    side = above(left - mid, 270) + voltage_ratio(-30) * mid
    top = signal.firwin(511, 15830, window=("kaiser", 9), fs=SR)
    mix = signal.oaconvolve(np.array([mid + side, mid - side]), top[None], "same")
    return roll_off(mix)


dry = scene()
out = record(dry)
pcm_store(out)
```